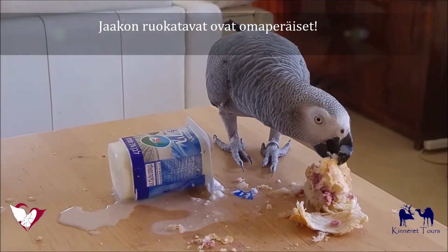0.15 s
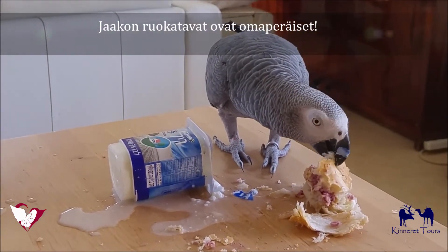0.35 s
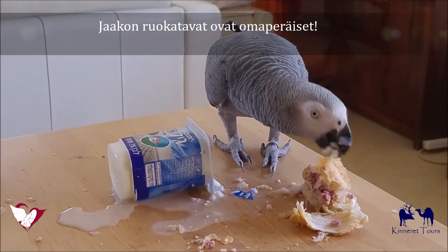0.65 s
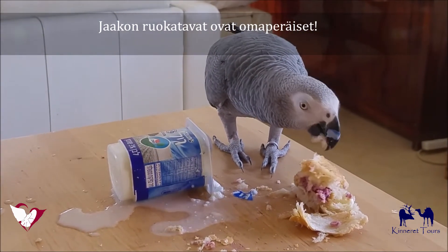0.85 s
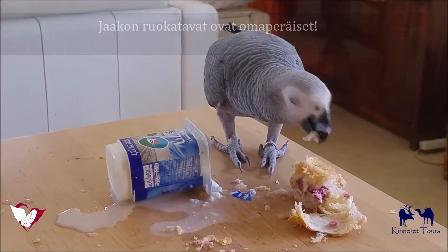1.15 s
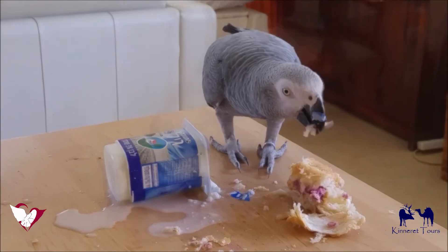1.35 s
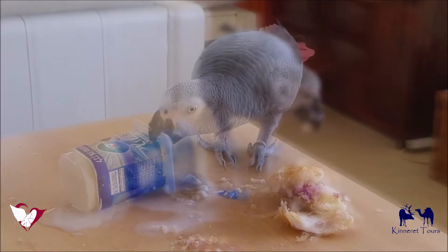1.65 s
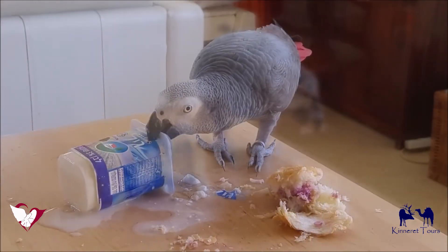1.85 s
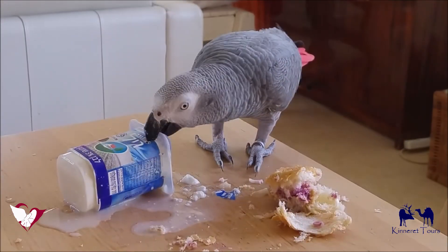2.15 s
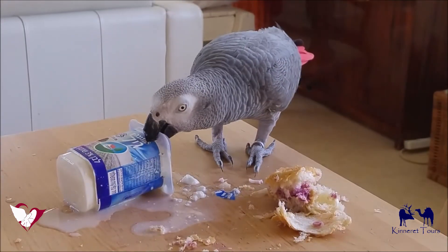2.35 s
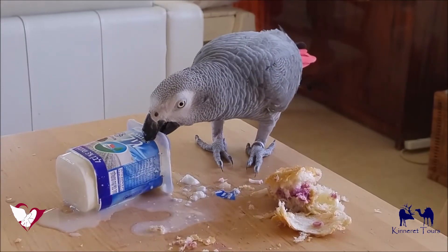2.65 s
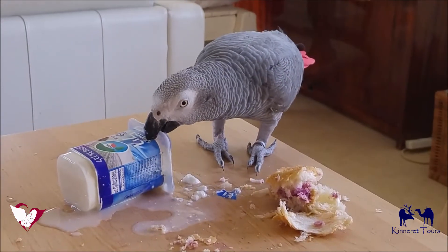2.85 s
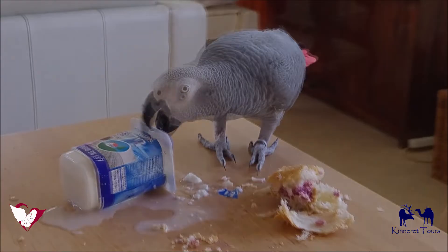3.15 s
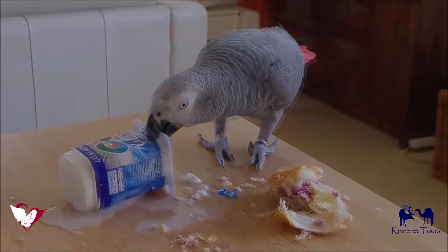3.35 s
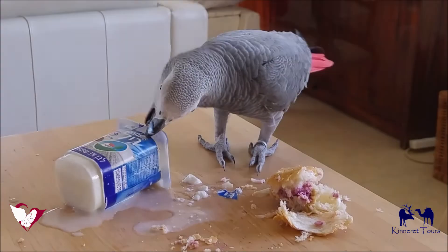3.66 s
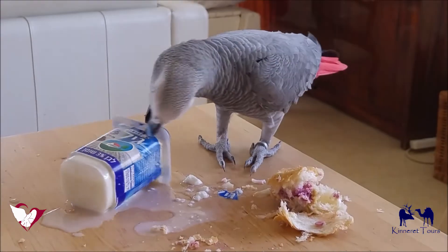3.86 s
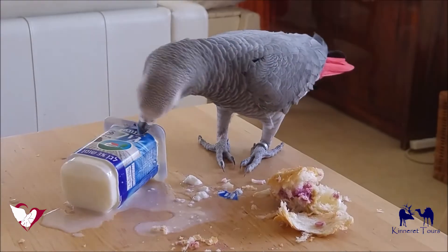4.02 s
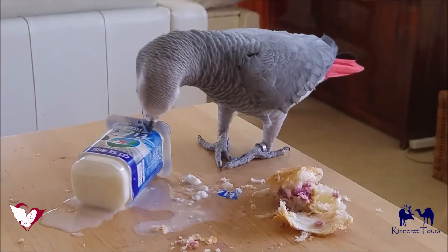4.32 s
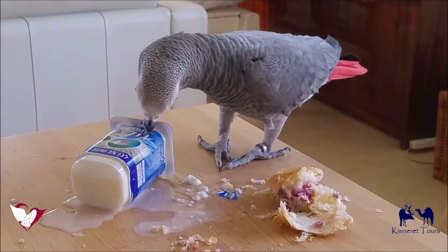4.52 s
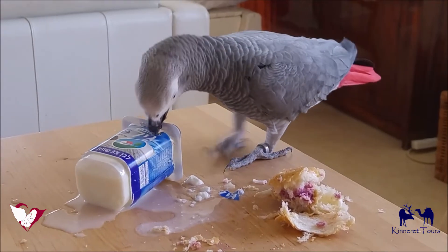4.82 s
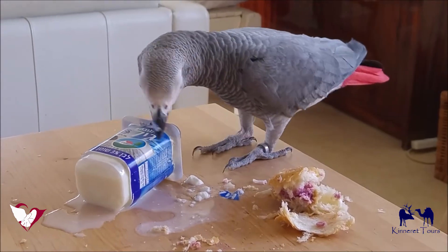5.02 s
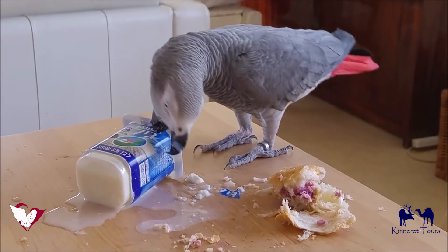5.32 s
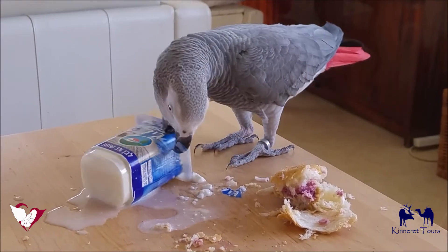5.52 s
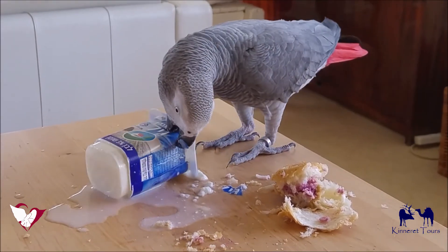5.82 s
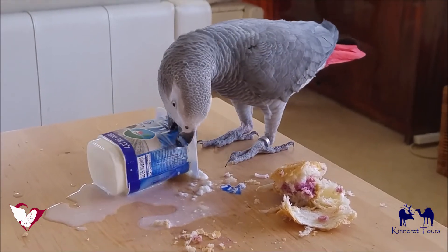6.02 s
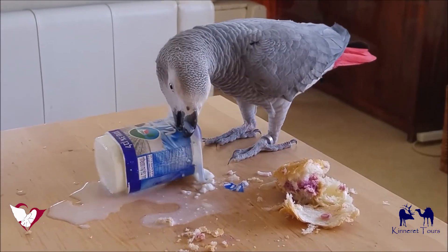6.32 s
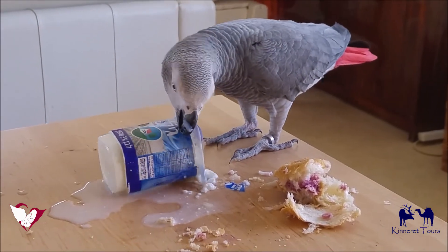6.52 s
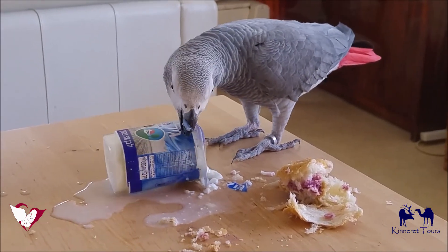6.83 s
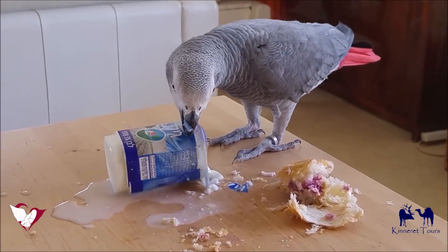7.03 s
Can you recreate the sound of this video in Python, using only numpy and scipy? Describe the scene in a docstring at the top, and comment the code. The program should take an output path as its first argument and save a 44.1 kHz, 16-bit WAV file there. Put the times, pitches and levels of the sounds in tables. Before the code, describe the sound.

A parrot's beak pecks and scrapes a thin plastic tub on a wooden table, ending in one loud clack over faint room hum.

```python
"""Parrot pecking a plastic tub

A parrot pecks, grips and nudges a thin plastic tub on a wooden table in a small room. The tub answers
with a hollow note of the air inside, a clack of its walls and a bright snap; at the end it springs
free and chatters. Between pecks the beak ticks, scrapes and creaks on the plastic, and the table top
thumps under the bird's feet and the rocking tub, all over a faint hum and hiss."""
import sys
import numpy as np
from scipy import signal
from scipy.fft import rfft, irfft
from scipy.io import wavfile
from scipy.ndimage import uniform_filter1d

SR = 44100
rng = np.random.default_rng(int(sys.argv[2]) if len(sys.argv) > 2 else 0)


def to_wav(s):
    """Save 16-bit WAV."""
    ch = np.atleast_2d(s).T  # columns
    pcm = np.round(np.clip(ch, -1, 1) * 32767)  # PCM
    wavfile.write(sys.argv[1], SR, pcm.astype(np.int16))


N = 316638
T = np.arange(SR // 4) / SR  # seconds since a hit


def amp(db):
    """Decibels to gain."""
    return 10 ** (np.asarray(db) / 20)


def unit_rms(x):
    """Scales to rms 1."""
    return x / np.sqrt(np.mean(x ** 2) + 1e-20)


def unit_hit(x):
    """Scales so that the loudest 4 ms have rms 1."""
    return x / np.sqrt(uniform_filter1d(x ** 2, size=176, mode="constant").max() + 1e-20)


def curve(points, hz):
    """Reads a breakpoint curve on a log-frequency axis."""
    point_hz, value = np.transpose(points)
    return np.interp(np.log(hz + 1), np.log(point_hz), value)


def bell(hz, centre_hz, octaves):
    """An EQ bell, 0 to 1, around one frequency."""
    return np.exp(-0.5 * (np.log2((hz + 1) / centre_hz) / octaves) ** 2)


def octaves_above(hz, corner_hz):
    """The ramp of a treble tilt: zero up to the corner, then one per octave."""
    return np.log2(np.maximum(hz / corner_hz, 1))


def eq(x, db_at):
    """Minimum-phase EQ with the gain db_at(hz), so nothing rings ahead of an attack."""
    log_gain = np.log(amp(db_at(abs(np.fft.fftfreq(4096, 1 / SR)))))
    taps = np.fft.ifft(np.exp(np.conj(signal.hilbert(log_gain)))).real
    return signal.oaconvolve(x, taps[:len(taps) // 2])[:len(x)]


def add(mix, start_s, sound):
    """Mixes a sound in at start_s."""
    part = mix[max(round(start_s * SR), 0):][:len(sound)]
    part += sound[:len(part)]


def grains(size, per_s, spread_db):
    """Randomly timed impulses of uneven strength."""
    strength = amp(spread_db * np.minimum(rng.exponential(1, size), 3)) * rng.choice([-1, 1], size)
    return strength * (rng.random(size) < per_s / SR)


def crack(contact_s):
    """A brief, white burst of micro-slips that stops when the contact lets go."""
    grip = np.exp(-(T / contact_s) ** 2)
    burst = rng.standard_normal(len(T)) * grip
    whitened = irfft(np.exp(1j * np.angle(rfft(burst))), len(T))
    return whitened * np.sqrt(grip)


# Early reflections off the table top and nearest walls: delay_s, level_db
ECHOES = [(.0017,-26.5), (.0075,-15), (0.0121,-9), (0.0156,-19)]
# Decay of the reverb tail: freq_hz, t60_s
ROOM_T60 = [(100, 0.75), (400, 0.15), (900, 0.58), (2000, 0.52), (5000, 0.41), (8000, .36), (14000, 0.3)]
# Tone of the reverb tail: freq_hz, gain_db
ROOM_EQ = [(100, 6.5), (350, 0), (560, -22), (800, -2), (2000, 2), (5000, 8), (8000, 6.5), (14000, 4)]

def room(x):
    """The small room returns near reflections and a short diffuse tail."""
    reflections = grains(SR * 3 // 4, per_s=5000, spread_db=4.0)
    hz, t, spectrum = signal.stft(reflections, SR, nperseg=256)
    decay = amp(curve(ROOM_EQ, hz)[:, None] - 60 * t / curve(ROOM_T60, hz)[:, None])
    response = signal.istft(spectrum * decay, SR, nperseg=256)[1]
    response *= np.clip(np.arange(len(response)) / SR / 0.0036 - 0.4, 0, 1)  # pre-delay and fade-in
    response /= np.linalg.norm(response)
    for delay_s, level_db in ECHOES:
        add(response, delay_s, amp([level_db]))
    return signal.fftconvolve(x, response)


def place(mix, start_s, sound, send_db):
    """Mixes in a sound together with its reverb."""
    add(mix, start_s, sound)
    add(mix, start_s, amp(send_db) * room(sound))


# Tone of the room's hum, rumble and hiss: freq_hz, gain_db
HUM_EQ = [(25,-47), (60,-12.5), (100,-9), (160,-3.5), (230,1.5), (370,-2), (470,-11), (570,-29), (720,-3.5),
          (880,-5.5), (1150,-17.5), (2000,-29), (5000,-38.5), (14000,-51)]
RUMBLE_EQ = [(20,-19.5), (40,-9), (65,3), (100,-8.5), (300,-23), (8000,-81)]
HISS_EQ = [(1500, -4), (3000, -47), (5500, -5.5), (7000, 8.5), (8200, 12), (9300, -5), (11700, -10),
           (13000, -48), (16000, -42)]
# Fader ride of the hum, ahead of its trim: time_s, level_db
HUM_RIDE = [(0.0, -59), (0.4, -53.5), (0.67, -62.5), (1.34, -61), (1.67, -56), (2.52, -61), (3.54, -54.5),
            (3.8, -62.5), (4.26, -59), (4.78, -60.5), (5.73, -58.5), (6.42, -61.5), (6.9, -60.5)]

def room_tone(hum_trim_db=1.0, rumble_db=-79.5, hiss_db=-74):
    """Three beds of noise: a low wavering hum, a steady rumble under it and a thin hiss."""
    ride_db = np.interp(np.arange(N) / SR, *np.transpose(HUM_RIDE))
    hum, rumble, hiss = (unit_rms(eq(rng.standard_normal(N), lambda hz: curve(tone, hz)))
                         for tone in (HUM_EQ, RUMBLE_EQ, HISS_EQ))
    return amp(ride_db + hum_trim_db) * hum + amp(rumble_db) * rumble + amp(hiss_db) * hiss


# Base tone of a tick: freq_hz, gain_db
TICK_EQ = [(500, 5.5), (1100, 13), (2200, 1), (4500, -5.5), (8500, 5.5), (11000, -12), (16000, -13)]

def tick(pitch_hz, body_db):
    """A tiny hard contact: a high ring and a little woody body; the less body, the purer the ring."""
    ring_db = 12 - 0.27 * body_db
    return unit_hit(eq(crack(0.0037), lambda hz: curve(TICK_EQ, hz)
                       + ring_db * bell(hz, pitch_hz, 0.17)
                       + 0.5 * bell(hz, 15000, 0.21)
                       + body_db * bell(hz, 1220, 1.0)))


# Clicks of beak and claws: start_s, level_db, pitch_hz, body_db
TICKS = [(0.046,-58,5860,1.5), (1.397,-42.5,9330,-3.5), (1.48,-47,8150,-2), (2.498,-55,4280,2),
         (2.578,-54,9600,0), (2.744,-39.5,7650,-14), (3.076,-53,7200,2), (3.781,-55.5,12700,-10.5),
         (4.139,-46,8170,6), (4.304,-51.5,7100,-5), (5.22,-55,8600,-18), (5.710,-47.5,7800,5),
         (5.862,-56.5,12700,-25), (5.924,-53.5,7200,-6), (5.943,-51,13300,-10), (5.953,-54,7800,-4),
         (6.096,-59,5240,-1), (6.273,-55.5,7300,0)]

def ticks(nibble_start_s=1.1, nibble_length_s=5.2, nibbles_per_s=5):
    """Beak and claws click, among fainter random nibbles."""
    clicks, out = np.zeros((2, N))
    for start_s, level_db, pitch_hz, body_db in TICKS:
        add(clicks, start_s, amp(level_db) * tick(pitch_hz, body_db))
    for when, force, spot in rng.random((round(nibbles_per_s * nibble_length_s), 3)):
        nibble = amp(-78 + 11.6 * force) * tick(pitch_hz=3200 * 2 ** spot, body_db=-8)
        add(clicks, nibble_start_s + when * nibble_length_s, nibble)
    place(out, 0, clicks, send_db=-11.5)
    return out


# Tone of a knock on the wooden top: freq_hz, gain_db
KNOCK_EQ = [(60, -48), (130, -2), (220, 7), (340, -1.5), (560, -15.5), (800, -4.5), (1300, -15),
            (2500, -37), (14000, -40)]
# Steps of the bird and rocks of the tub: start_s, boom_db, knock_db
THUMPS = [(0.384,-82,-52.5), (2.218,-47.5,-47.5), (2.961,-70,-58), (3.527,-54,-46.5), (3.715,-70,-50),
          (4.039,-57,-47), (4.307,-63,-50.5), (4.355,-63,-47), (4.485,-56.5,-55.5), (4.774,-58.5,-55),
          (5.254,-54.5,-54), (5.644,-42.5,-50), (6.143,-57,-53), (6.965,-55,-53)]

def table_thumps(boom_hz=66.9, boom_t60_s=0.31):
    """The table top booms and knocks dully under the bird's feet and the rocking tub."""
    out = np.zeros(N)
    attack = 1 - np.exp(-T / 0.0016)
    boom = attack * amp(-60 * T / boom_t60_s) * np.sin(2 * np.pi * boom_hz * T)
    for start_s, boom_db, knock_db in THUMPS:
        knock = unit_hit(eq(crack(0.05), lambda hz: curve(KNOCK_EQ, hz)))
        add(out, start_s, amp(boom_db) * boom + amp(knock_db) * knock)
    return out


# Tone of the rasp: freq_hz, gain_db
SCRAPE_EQ = [(600,-18), (1200,2), (2300,-37), (3800,-5.5), (5500,-9), (9000,-1), (12000,-19), (16000,-16)]
# Strokes of the beak along the rim: start_s, length_s, pressure_db
SCRAPES = [(1.388,0.17,-54.5), (1.554,0.29,-67.5), (1.838,0.35,-63), (2.038,0.072,-53.5),
           (2.111,0.035,-51.5), (2.391,0.16,-65.5), (2.506,0.092,-53.5), (2.572,0.13,-54.5),
           (2.68,0.33,-68), (2.953,0.45,-65), (5.655,.1,-49.5), (5.89,0.13,-53.5)]

def scrapes(bands=24, bite_s=0.0045, fade_db=-13):
    """The beak bites into the rim and eases off, rasping; each slip rings a few cycles at one pitch."""
    pressure, rasp, out = np.zeros((3, N))
    for start_s, length_s, pressure_db in SCRAPES:
        t = np.arange(0, length_s, 1 / SR)
        add(pressure, start_s, np.minimum(t / bite_s, 1) * amp(pressure_db + fade_db * t / length_s))
    for hz in np.linspace(1200, 15500, bands):
        ping = np.sin(2 * np.pi * hz * T[:256]) * np.exp(-T[:256] / 0.0005)
        slips = pressure * unit_rms(grains(N, per_s=170, spread_db=3))
        rasp += amp(curve(SCRAPE_EQ, hz)) * np.convolve(slips, ping / np.linalg.norm(ping))[:N]
    place(out, 0, rasp / np.sqrt(bands), send_db=-7.5)
    return out


# Modes of the tub's walls: pitch_hz, level_db, t60_s
WALL_MODES = [(517,-37,.025), (719.3,0.5,0.11), (762,-1.5,0.042), (910,-5.5,0.05), (1013,-6.5,0.046),
              (1201,4,0.029), (1280,-11.5,0.076), (1576,2.5,0.023), (1683,-11.5,0.049), (2058,-2.5,0.032),
              (2286,-2,0.019), (2640,-21,0.013), (2872,-12,0.057), (3430,-15,0.018)]

def walls(focus_hz, lift_db=9, uneven_db=3.5):
    """The walls ring; the struck spot favours the modes near focus_hz, and the grip detunes them."""
    ring = 0
    for k, (pitch_hz, level_db, t60_s) in enumerate(WALL_MODES):
        detuned_hz = pitch_hz * (1 + 0.013 * rng.standard_normal())
        struck_db = level_db + lift_db * bell(pitch_hz, focus_hz, 0.13)
        struck_db += uneven_db * rng.standard_normal()
        mode = (-1) ** k * np.sin(2 * np.pi * detuned_hz * T + rng.uniform(-1.03, 1.67))
        ring += amp(struck_db - 60 * T / t60_s) * mode
    attack = (1 - np.exp(-T / 0.00034)) ** 2
    return attack * ring


# High modes of the rim: pitch_hz, level_db, t60_s
RIM_MODES = [(4300,-5,0.032), (4650,-11,0.017), (5140,-28,0.06), (6800,9,0.061), (7410,-12.5,0.09),
             (8520,-3.5,0.042)]

def rim():
    """The stiff rim rings short and bright."""
    return sum(amp(level_db - 60 * T / t60_s) * np.sin(2 * np.pi * (pitch_hz * T + rng.random()))
               for pitch_hz, level_db, t60_s in RIM_MODES)


# Tone of thin plastic snapping, in shoves and pecks alike: freq_hz, gain_db
SNAP_EQ = [(1500,-15.5), (2400,-17.5), (3300,-8), (4500,-3), (5700,-9), (7700,1), (9500,-9.5),
           (12000,-14.5), (15500,-23.5)]
# Shoves of the tub: start_s, length_s, level_db, wall_focus_hz
SHOVES = [(1.839,0.047,-56.5,1690), (2.921,.3,-60,875), (4.238,0.27,-65,895), (6.973,0.1,-35.5,920),
          (6.999,0.09,-44.5,1580)]

def chatter():
    """The tub slides on the table and rattles its own walls and rim; light shoves sound duller."""
    out = np.zeros(N)
    for start_s, length_s, level_db, wall_focus_hz in SHOVES:
        t = np.arange(0, length_s, 1 / SR)
        swell = abs(np.sin(np.pi * t / length_s)) ** 0.57
        slips = amp(level_db) * swell * unit_rms(grains(len(t), per_s=620, spread_db=1.5))
        ring = unit_hit(walls(wall_focus_hz, lift_db=16.5, uneven_db=1.0))
        ring += amp(-15) * unit_hit(rim())
        ring += amp(-7.5) * unit_hit(eq(crack(0.0019), lambda hz: curve(SNAP_EQ, hz)))
        cut_db_per_octave = max(0.22 * (-53 - level_db), 0)
        ring = eq(ring, lambda hz: -cut_db_per_octave * octaves_above(hz, 1400))
        place(out, start_s, signal.fftconvolve(slips, ring / np.linalg.norm(ring)), send_db=-13)
    return out


def hollow_note(wall_db, rest_hz=358.4, dent_db=-31, rise_hz_per_db=8.5, t60_s=0.052):
    """The air in the tub rings; a blow harder than dent_db dents the tub and raises the note."""
    pitch_hz = rest_hz + rise_hz_per_db * max(wall_db - dent_db, 0)
    attack = 1 - np.exp(-T / 0.0089)
    return unit_hit(attack * amp(-60 * T / t60_s) * np.sin(2 * np.pi * pitch_hz * T))


# Tone of the noise in a clack: freq_hz, gain_db
CLACK_EQ = [(150,-11), (480,0), (600,-7.5), (800,16.5), (1600,2), (1900,-0.5), (2400,-5), (3400,-10.5),
            (8000,-28), (14000,-46)]

def clack(wall_focus_hz, upper_focus_hz, softness_db):
    """The struck walls ring over a toneless burst; a soft contact loses treble."""
    ring = unit_hit(walls(wall_focus_hz))
    burst = unit_hit(eq(crack(0.0074), lambda hz: curve(CLACK_EQ, hz)))
    cut_db_per_octave = np.clip(0.4 * (softness_db - 8), 0, 7)
    return unit_hit(eq(ring + amp(-4.5) * burst, lambda hz: 7 * bell(hz, upper_focus_hz, 0.069)
                       - cut_db_per_octave * octaves_above(hz, 1400)))


def snap(focus_hz, softness_db):
    """The plastic buckles with one crack and a short crunch, and sets the rim ringing."""
    buckle = unit_hit(crack(0.0033)) + amp(-14) * unit_hit(crack(0.023)) + amp(-21.5) * unit_hit(rim())
    cut_db_per_octave = np.clip(0.26 * (softness_db - 20.5), -1.5, 7)
    return unit_hit(eq(buckle, lambda hz: curve(SNAP_EQ, hz)
                       + 6.5 * bell(hz, focus_hz, 0.18)
                       - 2 * bell(hz, 12600, 0.59)
                       - cut_db_per_octave * octaves_above(hz, 2500)))


def blow(hollow_db, wall_db, snap_db, wall_focus_hz, upper_focus_hz):
    """One contact of beak and tub layers a hollow note, a clack and a snap."""
    softness_db = wall_db - snap_db  # little snap means a soft, long contact
    return (amp(hollow_db) * hollow_note(wall_db)
            + amp(wall_db) * clack(wall_focus_hz, upper_focus_hz, softness_db)
            + amp(snap_db) * snap(upper_focus_hz, softness_db))


# Beak hits on the tub: start_s, hollow_db, wall_db, snap_db, wall_focus_hz, upper_focus_hz, send_db
PECKS = [(1.857,-46,-53.5,-57,840,6100,-2), (2.208,-39.5,-46,-56,770,7500,-2.5),
         (3.194,-78,-42,-31,1280,4440,-5), (3.341,-46.5,-37.5,-55,780,2080,-3.5),
         (3.455,-47,-45,-55.5,700,2940,-3), (3.524,-34,-36.5,-50,650,2830,-1),
         (3.600,-57,-42.5,-36,1720,7060,-6.5), (3.961,-47,-59.5,-95,730,8270,0),
         (4.015,-40,-41,-37.5,900,8600,-4.5), (4.137,-57,-50.5,-58,690,8600,0.5),
         (4.355,-55,-77,-82,800,7500,6), (4.603,-68,-56.5,-77,1180,8040,-1),
         (4.991,-53,-35,-57.5,736,3640,-2), (5.631,-37,-32.5,-43,1000,4740,-2),
         (5.764,-55.5,-53,-41.5,1190,8600,-6.5), (6.177,-65,-51.5,-59,1020,2870,1.5),
         (6.578,-59,-49.5,-45.5,2120,5340,-5), (6.669,-60,-43.5,-84,790,8160,-10),
         (6.9606,-33.5,-19,-25.5,950,5000,-3)]

def pecks(rebound_s=0.0115):
    """Each peck is a blow, then a weaker one as the tub drops back against the beak."""
    out = np.zeros(N)
    for start_s, hollow_db, wall_db, snap_db, wall_focus_hz, upper_focus_hz, send_db in PECKS:
        peck = blow(hollow_db, wall_db, snap_db, wall_focus_hz, upper_focus_hz)
        rebound = blow(hollow_db - 7, wall_db - 14, snap_db - 14, wall_focus_hz, upper_focus_hz)
        add(peck, rebound_s, rebound)
        place(out, start_s, peck, send_db)
    return out


# Tiny creaks of the beak: start_s, level_db, pitch_hz
CREAKS = [(1.977,-67,4270), (1.988,-67,4530), (2.688,-60.5,5600), (2.702,-55.5,5300), (5.184,-63.5,4940),
          (6.368,-67.5,3560)]

def creaks():
    """The beak slips on the plastic: one narrow band swells and dies in a few milliseconds."""
    out = np.zeros(N)
    for start_s, level_db, pitch_hz in CREAKS:
        slips = crack(0.0042) * (1 - np.exp(-T / 0.0048))
        creak = unit_hit(eq(slips, lambda hz: 40 * (bell(hz, pitch_hz, 0.72) - 1)))
        place(out, start_s, amp(level_db) * creak, send_db=-7)
    return out


def scene():
    """The mono mix, heard from one spot near the table."""
    return (pecks() + ticks() + creaks() + scrapes() + chatter() + table_thumps() + room_tone())[None]


def record(dry):
    """A steep low-pass at 16.1 kHz on the whole mix."""
    low_pass = signal.firwin(255, 16100, window=("kaiser", 8), fs=SR)
    return signal.oaconvolve(dry, low_pass[None], "same")


dry = scene()
out = record(dry)
to_wav(out)
```